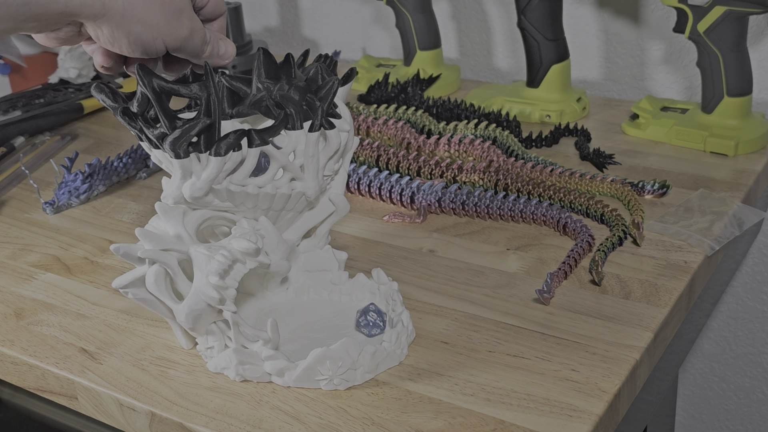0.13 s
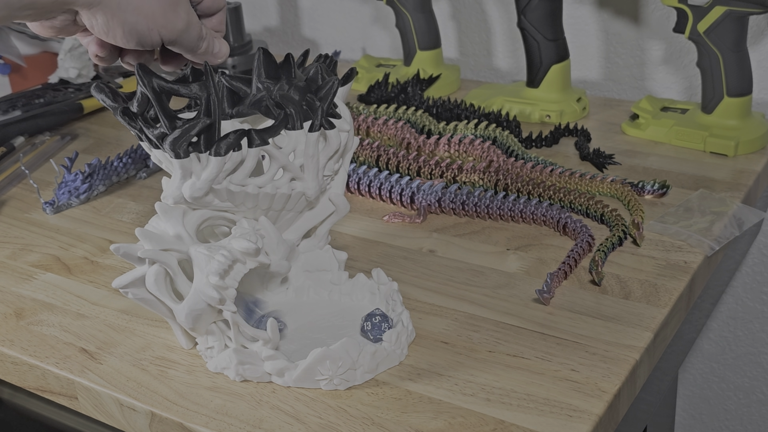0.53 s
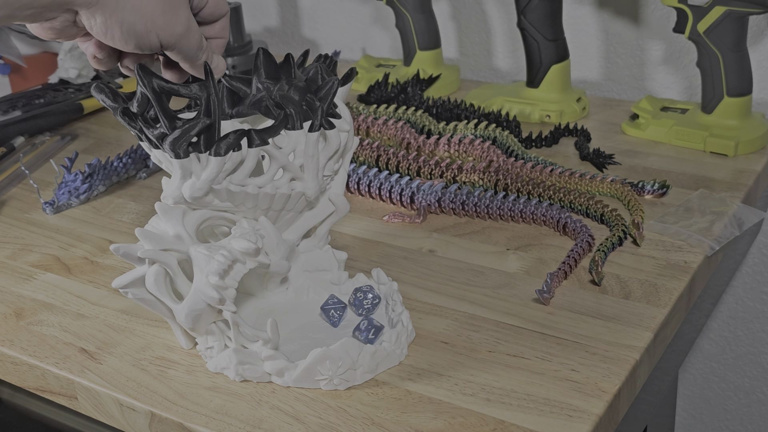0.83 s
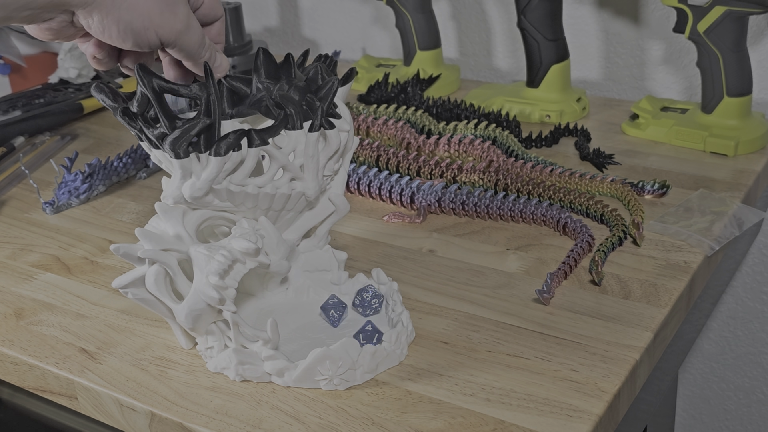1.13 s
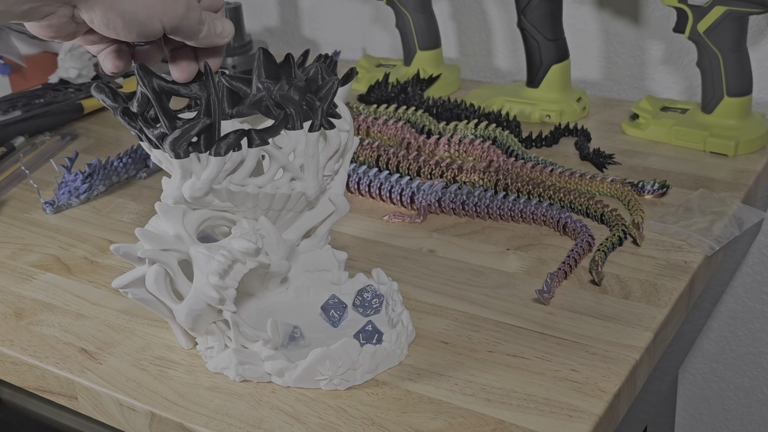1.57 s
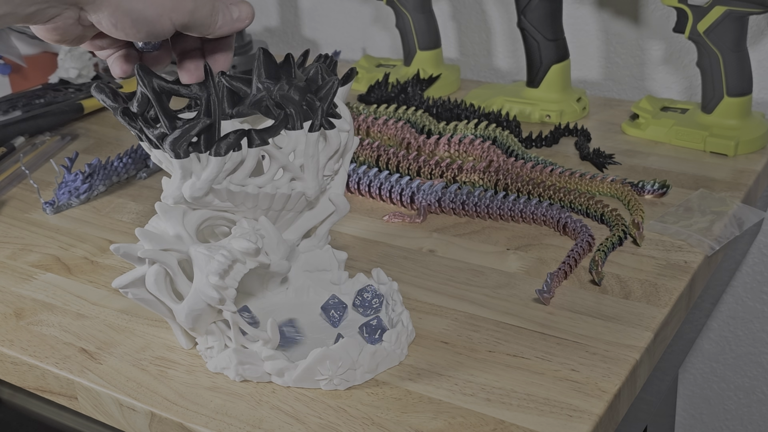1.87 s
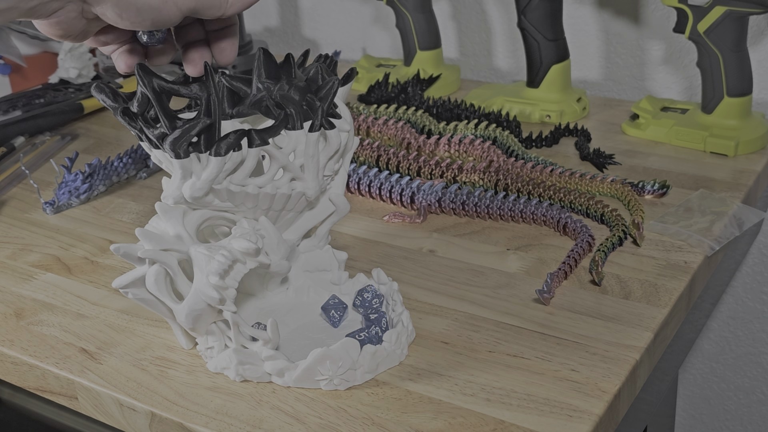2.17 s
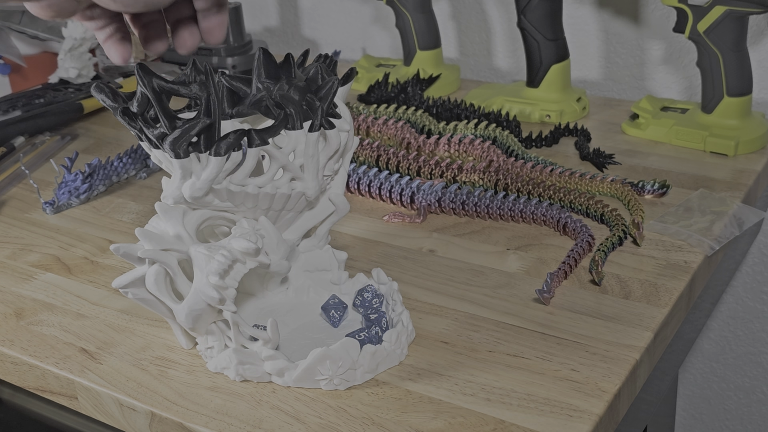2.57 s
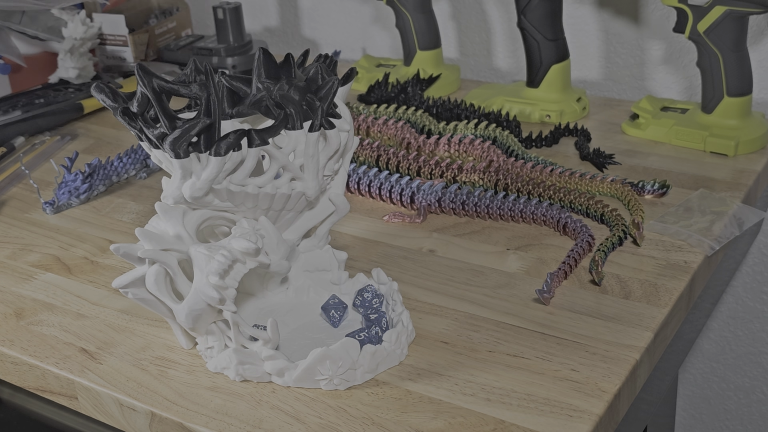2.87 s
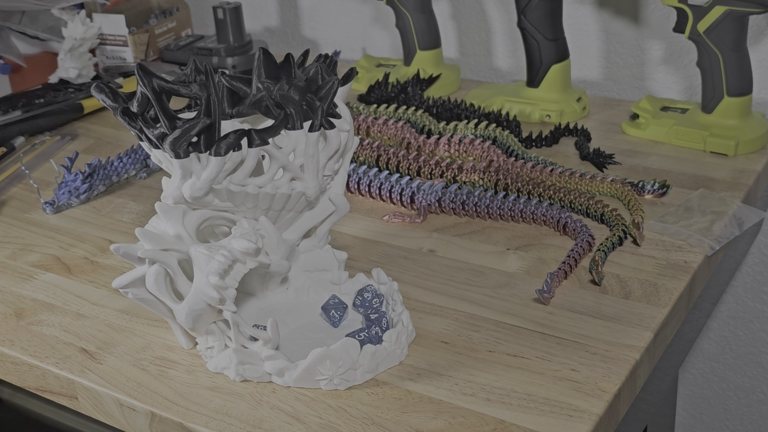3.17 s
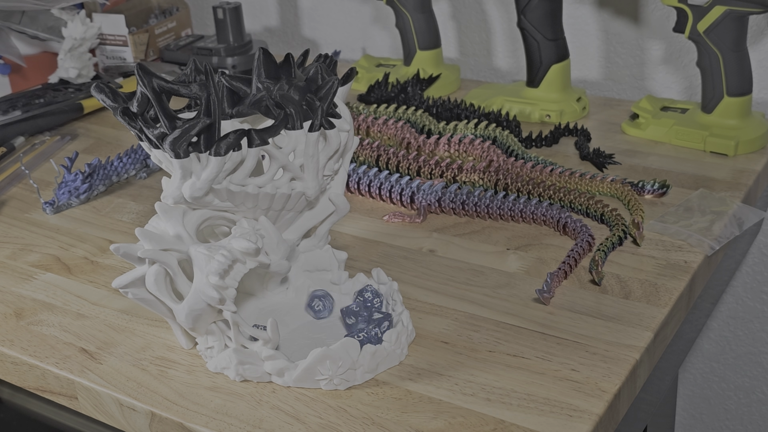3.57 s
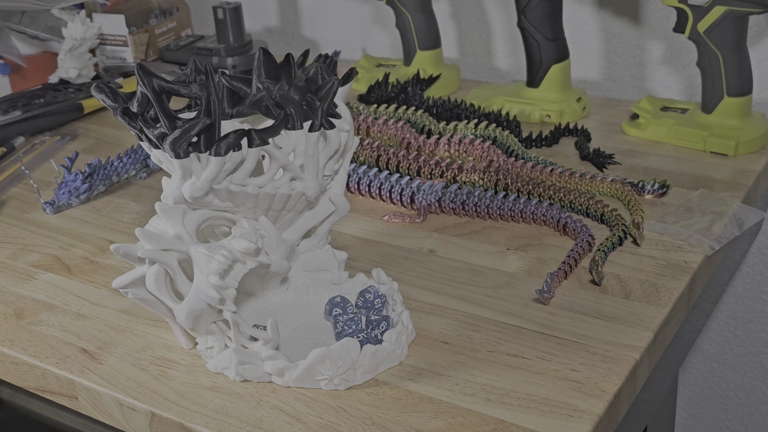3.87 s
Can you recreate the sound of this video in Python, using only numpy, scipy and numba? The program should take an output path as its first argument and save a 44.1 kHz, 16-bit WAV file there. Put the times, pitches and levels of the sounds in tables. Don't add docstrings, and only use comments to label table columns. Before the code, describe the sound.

Plastic dice rattle and knock through a hollow printed tower in bursts, then settle on a tray

```python
import sys
import numpy as np
from scipy import signal
from scipy.fft import rfft, irfft
from scipy.io import wavfile
from scipy.ndimage import uniform_filter1d
from numba import njit

SR = 44100
rng = np.random.default_rng(int(sys.argv[2]) if len(sys.argv) > 2 else 0)


def attenuation_scalar(level_db):
    decades = np.asarray(level_db, float) / 20
    return 10 ** decades


def materialize(psi):
    bounded = np.clip(np.atleast_2d(psi).T, -1, 1)
    quanta = np.round(bounded * 32767).astype(np.int16)
    wavfile.write(sys.argv[1], SR, quanta)


N = 176400

# pitch_hz, level_db (per Hz)
AIR = [(40, -9.5), (220, -7), (380, -12.5), (1100, -15.5), (2000, -24.5), (4500, -30), (10000, -40.5),
       (16000, -46)]
# pitch_hz, level_db (rms)
TONES = [
    (52, -50.5),
    (190, -60),
    (222, -55),
    (15014, -77),
]

# start_s, level_db
# (peak), pitch_hz (of the struck spot), tick_db (against the peak)
KNOCKS = [(0.0454, -12, 1870, -14.5), (0.1072, -11.5, 3000, -21), (0.1181, -7.5, 2280, -15),
          (0.2239, -13, 3450, -11.5), (0.2421, -8, 3770, -20), (0.2631, -9, 2170, -29),
          (0.2949, -10, 2800, -22), (0.3517, -4, 3620, -16.5), (0.407, -4, 2500, -24.5),
          (0.4299, -13, 1660, -9.5), (0.4793, -8, 3100, -8), (0.5245, -10.5, 2940, -12),
          (0.5574, 0.5, 3820, -17.5), (0.63, -3, 2040, -21.5), (0.6674, -6, 1680, -12),
          (0.7098, -13, 2010, -9), (0.7184, -9, 3750, -20), (0.7333, -10.5, 1870, -8),
          (0.8325, -17.5, 1690, -21),
          (0.9833, -13.5, 4260, -5), (1.0174, -19, 3320, -13), (1.052, -27.5, 4560, -4),
               (1.0739, -28, 4300, 11), (1.1295, -22, 4400, -13), (1.1534, -7, 3440, -19.5),
               (1.1829, -4.5, 3550, -5), (1.2192, -14.5, 4850, 0.5), (1.2322, -6, 3160, -14),
               (1.2532, -10, 2350, -17), (1.318, -18, 5170, -2.5), (1.3444, -15.5, 2340, -9),
               (1.3545, -13.5, 2700, 2), (1.3908, -20, 6270, 6), (1.411, -24, 5840, 11),
               (1.4244, -6.5, 1320, -21), (1.4675, -5.5, 4070, -24), (1.4916, -5, 2570, -36),
               (1.5397, -10.5, 2600, -15), (1.5723, -3, 2400, -26), (1.5981, -7, 3820, -5.5),
          (1.6226, -8.5, 3620, -19), (1.6561, -6, 3350, -20), (1.695, -11.5, 3200, -10),
            (1.7113, -4.5, 1410, -11.5), (1.782, -6, 4160, -22), (1.787, -5.5, 4960, -12),
            (1.836, -22, 3760, -9), (1.8503, -12.5, 2010, -26), (1.8813, -11.5, 1350, -36),
            (1.9144, -17.5, 2000, -37), (1.9332, -10.5, 2100, -10.5), (1.992, -15, 5260, -11),
            (2.0161, -32.5, 4770, 12), (2.0744, -20.5, 1790, -23),
          (2.446, -5, 4270, -28), (2.4653, -2.5, 2400, -25.5), (2.4982, -2.5, 4100, -16.5),
            (2.528, -8.5, 2210, -20), (2.6033, -9.5, 4140, -15.5), (2.6196, -18, 1820, -11),
            (2.664, -7.5, 3270, -22.5), (2.7504, -14, 2320, -17), (2.796, -14, 2240, -17),
            (2.846, -4, 3860, -24), (2.911, -10, 1260, -17), (2.9501, -3, 2440, -35.5),
            (3.034, -7.5, 2010, -12), (3.1122, -5.5, 3400, -15), (3.175, -6.5, 2280, -18.5),
            (3.2323, -16, 1890, -20), (3.268, -14, 5370, -9), (3.3578, -25, 2750, -12),
          (3.331, -10, 4300, -25), (3.3975, -30.5, 2200, -7.5), (3.427, -22, 1900, -27),
            (3.4655, -44, 1960, -22), (3.4764, -21, 1980, -87), (3.499, -24, 1950, -26),
            (3.522, -17, 1880, -9.5), (3.5626, -20.5, 2170, -28), (3.5905, -21, 2930, -14),
            (3.663, -31, 1720, -13.5),
          (0.0008, -16, 3520, -61), (0.1283, -8, 3370, -8), (0.142, -8, 3700, -15),
            (0.2024, -12, 2200, -17.5), (0.316, -13.5, 2600, -11.5), (0.489, -11.5, 2250, -31),
            (1.6369, -10, 3730, -11.5), (1.679, -15.5, 3220, -8), (1.7382, -28, 2240, 7.5)]
# start_s, level_db, pitch_hz, tick_db
MORE_KNOCKS = [(.165, -17, 2500, -9), (.193, -12.5, 2840, -24), (.589, -18, 7340, -5), (.6984, -18.5, 7640, -5),
               (.8041, -23, 2000, -14), (.813, -32, 2500, -0.5), (.846, -15.5, 1700, -15),
               (.8959, -34, 1700, -2), (.9777, -15.5, 2950, -3), (1.272, -16, 3000, -8),
               (1.283, -7.5, 2300, -29), (1.302, -15, 2520, -16), (1.374, -8.5, 3050, -19),
               (1.448, -12.5, 3480, -14), (1.48, -7, 4560, -14), (1.504, -13.5, 3480, 3.5),
               (1.614, -14, 4000, -2), (1.777, -8, 2940, -11), (1.802, -17, 3000, -6),
               (1.878, -11.5, 2530, -18), (1.948, -16, 3000, -8.5), (1.961, -20, 3500, -1),
               (2.009, -22, 2980, -2), (2.03, -21, 3860, -5.5), (2.083, -25, 2500, -14),
               (2.135, -28.5, 2470, -20), (3.437, -31.5, 2000, -9), (3.536, -17.5, 1950, -36),
               (3.556, -29, 2100, -2), (3.576, -33, 2100, -2), (3.61, -37, 2500, -11), (3.6825, -31, 1900, -32),
               (3.7967, -29.5, 1200, -32), (3.8635, -40, 2490, -12), (1.417, -23, 5500, 4),
               (1.65, -14, 3300, -20), (.432, -14, 2500, -16), (2.12, -28, 2500, -14), (3.45, -32, 2050, -27),
               (3.51, -30, 2050, -24), (3.545, -27, 2050, -24), (.87, -24, 1700, -18)]

TOWER = [819, 1156, 1298, 1730, 2005, 2204, 2590, 2940, 3249, 3670, 4340, 4820]
# pitch_hz, level_db
WALL = [(500, -24.5), (950, -14.5), (1250, -3), (2500, 2), (4500, 7.5), (6000, -1), (10000, -8),
        (16000, -15.5)]
# start_s, level_db
TUMBLE = [(0, -28), (.04, -35), (.14, -42.5), (.72, -29), (.9, -40.5), (.95, -51), (1.14, -39),
          (1.2, -27.5), (1.75, -30.5), (2.06, -37.5), (2.19, -56.5), (3.3, -43), (3.42, -40.5), (3.6, -36),
          (3.72, -51.5), (4, -57.5)]
ON_TRAY_S = [.72, .95, 1.95, 2.4, 3.38]
# pitch_hz, level_db (against the knock), fade_s (to -60 dB)
BENCH = [
    (147.5, -35.5, 0.13),
    (223.4, -36, 0.11),
    (446, -36.5, 0.041),
]
# pitch_hz, level_db (against the contact), fade_s (to -60 dB)
TRAY = [
    (454, -29.5, 0.059),
    (620, -27, .06),
    (927, -23.5, 0.033),
    (2050, -21, 0.06),
]

LEFT_DB, RIGHT_LATE_S = 0.45, 0.000125
RISE_CYCLES = 1.5


def walk(rate):
    hold = int(SR / rate)
    steps = np.repeat(rng.standard_normal(N // 100), hold)[:N]
    return uniform_filter1d(uniform_filter1d(steps, hold), hold)


def workshop():
    f = np.arange(N // 2 + 1) * SR / N + 1
    air_hz, air_db = np.array(AIR).T
    shape = attenuation_scalar(np.interp(np.log(f), np.log(air_hz), air_db)) * (f < 15750)
    mid, side = rfft(rng.standard_normal((2, N)))
    apart = 1 / np.sqrt(1 + (500 / f) ** 2.55)
    both = shape * (mid + apart * side * np.array([[1], [-1]])) / np.sqrt(1 + apart ** 2)
    air = np.zeros((2, N))
    for octave in range(11):
        band = np.clip(1 - abs(np.log2(f / 20) - octave), 0, 1)
        air += irfft(both * band, N) * attenuation_scalar(1.2 * walk(5))
    air = air * attenuation_scalar(-46.5) / air.std()
    hum = np.zeros(N)
    for hz, db in TONES:
        level = attenuation_scalar(db + 1.5 + 2 * walk(5.57))
        pitch = hz + 1.5 * walk(7.78)
        hum += level * np.sin(2 * np.pi * np.cumsum(pitch) / SR)
    return air + hum


@njit
def ring(start, hz, t60, gain, rise, size):
    out = np.zeros((2, size))
    for m in range(len(hz)):
        s = 2j * np.pi * hz[m] / SR - np.log(1000.) / (t60[m] * SR)
        turn, swell = np.exp(s), np.exp(-hz[m] / SR / rise)
        for c in range(2):
            first = max(int(start[c, m]) + 1, 0)
            z = gain[c, m] * np.exp(s * (first - start[c, m]))
            unrisen = 1.
            for i in range(first, min(size, first + int(t60[m] * SR))):
                out[c, i] += z.imag * (1 - unrisen)
                z *= turn
                unrisen *= swell
    return out


def knocks(rows, count):
    t, db, spot, tick = np.array(rows).T[:, :, None]
    tower = np.array(TOWER)
    a = len(tower)
    n = rng.standard_normal((len(rows), 2, a + count))
    u = rng.random((len(rows), 3, a + count))

    edge, colour = np.log2(np.array(WALL)[:, 0]), np.array(WALL)[:, 1]
    place = ((np.arange(count) + u[:, 0, a:]) / count) ** 1.4
    wall = 2 ** edge[0] + (2 ** edge[-1] - 2 ** edge[0]) * place
    trailing = u[:, 2, a:] > 0.16
    contact_s, spread_s = 0.001, 0.012
    late = -spread_s * np.log(u[:, 1, a:]) * trailing + contact_s * u[:, 2, a:]
    wall_db = -18 + np.interp(np.log2(wall), edge, colour)
    wall_db = wall_db + 7 * np.exp(-(np.log2(wall / spot) / 0.32) ** 2)
    treble = 1 / (1 + (5260 / wall) ** 4)
    bass = 1 / (1 + (wall / 1e3) ** 4)
    wall_db = wall_db + (tick + 17.5) * (treble - 0.18 * bass)
    wall_db = wall_db - 650 * late * (wall / 2500) ** 0.1
    chink = 6040 * 2 ** (1.35 * u[:, 2, :1])
    wall_db = wall_db + (8 * np.exp(-(np.log2(wall / chink) / 0.34) ** 2) - 4) * treble

    mode_db = -22 - 6 * (np.log2(tower / spot) / 0.97) ** 2 + 3 * n[:, 0, :a]
    mode_hz = tower * (1 + 0.022 * (u[:, 0, :a] - 0.5))
    mode_t60 = 0.061 * 2 ** (u[:, 1, :a] - 0.5)

    hz = np.hstack([mode_hz, wall])
    t60 = np.hstack([mode_t60, 39.3 / wall])
    start = (t + np.hstack([0.001077 * u[:, 2, :a], late])) * SR
    like = 0.55 / (1 + (hz / 8650) ** 2)
    left = np.sign(n[:, 0])
    right = like * left + np.sqrt(1 - like ** 2) * n[:, 1]
    gain = np.array([left * attenuation_scalar(LEFT_DB), right * attenuation_scalar(-LEFT_DB)])
    gain = gain * attenuation_scalar(db + np.hstack([mode_db, wall_db]))
    starts = np.array([start, start + RIGHT_LATE_S * SR]).reshape(2, -1)
    return ring(starts, hz.ravel(), t60.ravel(), gain.reshape(2, -1), RISE_CYCLES, N)


def rattle(count):
    u = rng.random((count, 3))
    t = (np.arange(count) + 3 * u[:, 0] - 3) / count * N / SR
    db = np.interp(t, *np.array(TUMBLE).T) + 11 + 7 * u[:, 1] ** 2
    tray = np.searchsorted(ON_TRAY_S, t) % 2 == 1
    spot = np.where(tray, 1690, 2600) * 2 ** (0.62 * (2 * u[:, 2] - 1))
    tick = np.where(tray, -31, -19)
    return np.c_[t, db, spot, tick], tray


def thump(rows, modes):
    t, db = np.array(rows).T[:2, :, None]
    hz, mode_db, t60 = np.array(modes).T
    n = rng.standard_normal((len(rows), 3, len(modes)))
    gain = (attenuation_scalar(db + mode_db + 4 * n[:, 0]) * np.sign(n[:, 2])).ravel()
    start = (t * SR + 0 * hz).ravel()
    starts = np.array([start, start + RIGHT_LATE_S * SR])
    pitch = (hz * (1 + 0.043 * n[:, 1])).ravel()
    return ring(starts, pitch, np.tile(t60, len(rows)), np.array([gain, gain]), RISE_CYCLES, N)


def room(x):
    t = np.arange(SR // 2) / SR
    noise = rng.standard_normal((2, len(t)))
    low = signal.lfilter(*signal.butter(1, 4000, fs=SR), noise)
    low_t60_s, treble_t60_s, rise_s = 0.46, 0.22, 0.0013
    tail = low * attenuation_scalar(-60 * t / low_t60_s) + (noise - low) * attenuation_scalar(-60 * t / treble_t60_s)
    tail = tail * (1 - np.exp(-t / rise_s))
    tail = tail / np.sqrt((tail ** 2).sum(axis=1).mean())
    return signal.fftconvolve(x[None], tail, axes=1)[:, :N]


def scene():
    rows = KNOCKS
    small, on_tray = rattle(count=800)
    dice = knocks(rows, count=400) + knocks(small, count=50) + knocks(MORE_KNOCKS, count=200)
    dice = signal.sosfilt(signal.butter(2, 480, "high", fs=SR, output="sos"), dice)
    heard = dice + attenuation_scalar(-7.5) * room(dice.mean(axis=0)) + workshop()
    return heard + thump(rows, BENCH) + thump(small[on_tray], TRAY)


def roll_off(x):
    return signal.sosfilt(signal.butter(12, 16820, fs=SR, output="sos"), x)


def record(dry):
    x = signal.sosfilt(signal.butter(4, 43.7, "high", fs=SR, output="sos"), dry)
    x = signal.sosfilt(signal.cheby1(8, 1, 15900, fs=SR, output="sos"), np.tanh(x))
    return roll_off(x)


dry = scene()
out = record(dry)
materialize(out)
```